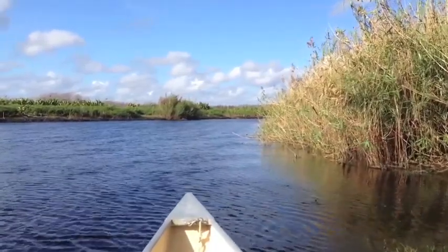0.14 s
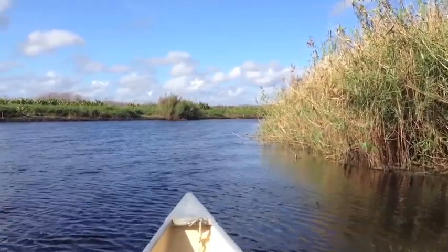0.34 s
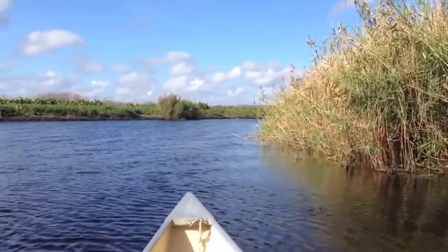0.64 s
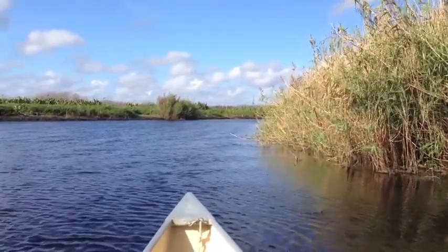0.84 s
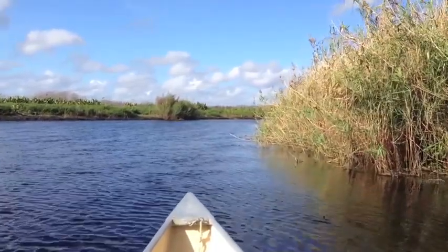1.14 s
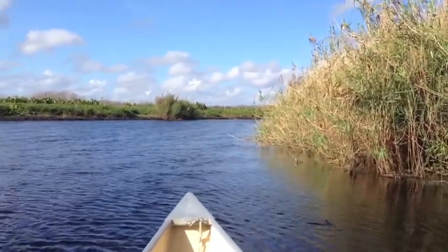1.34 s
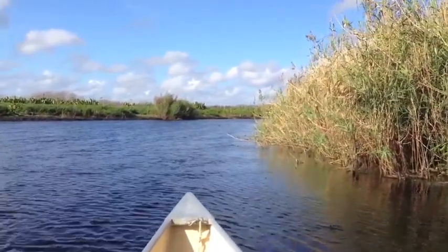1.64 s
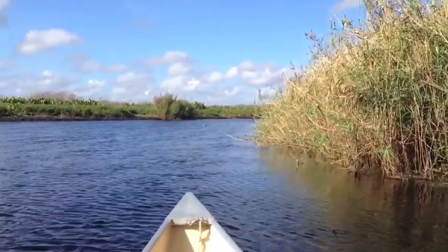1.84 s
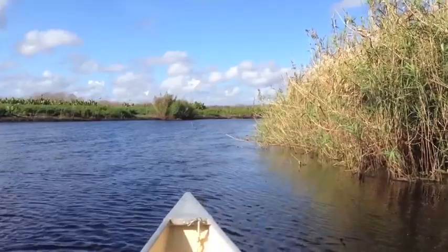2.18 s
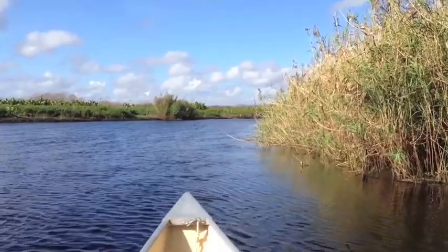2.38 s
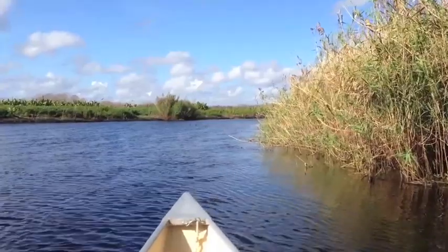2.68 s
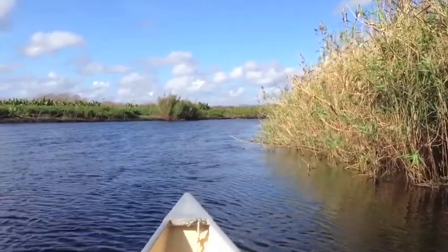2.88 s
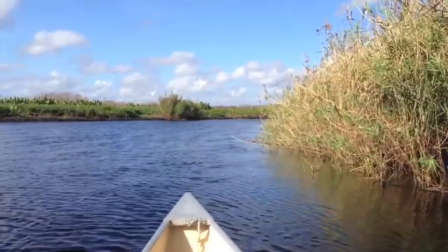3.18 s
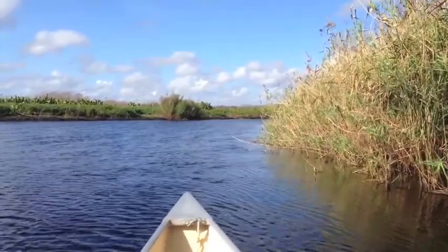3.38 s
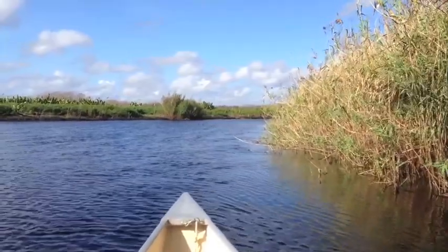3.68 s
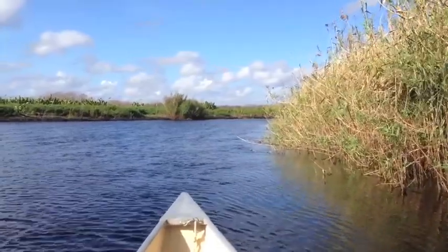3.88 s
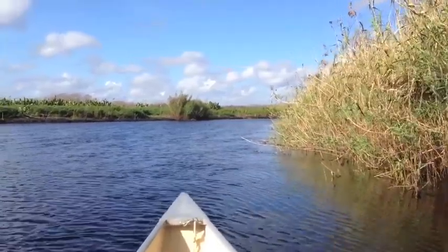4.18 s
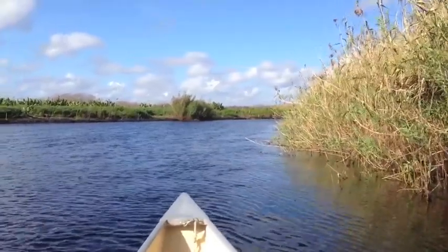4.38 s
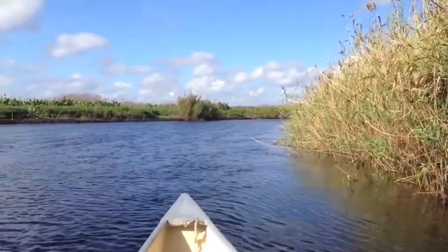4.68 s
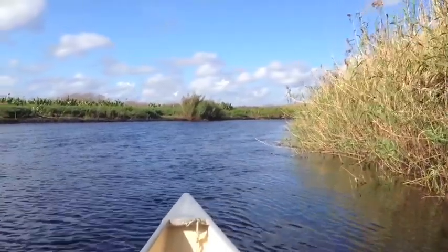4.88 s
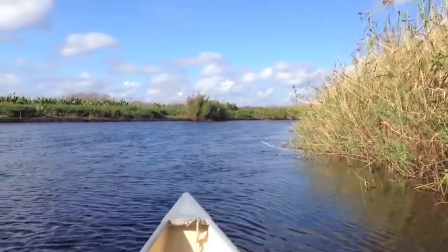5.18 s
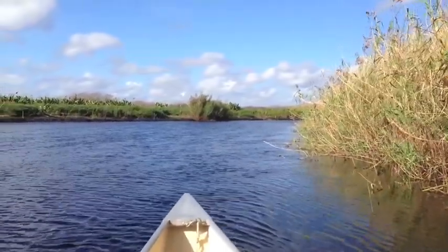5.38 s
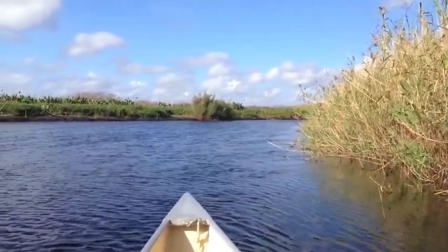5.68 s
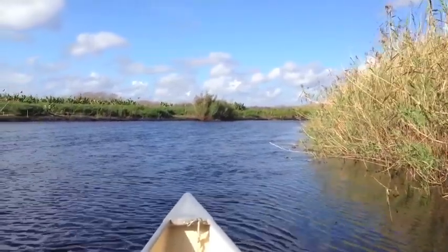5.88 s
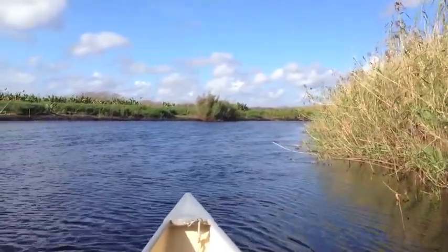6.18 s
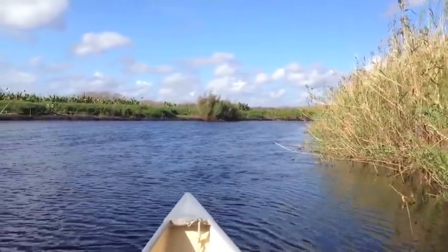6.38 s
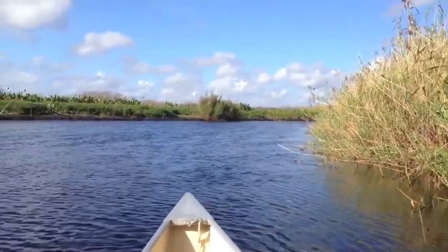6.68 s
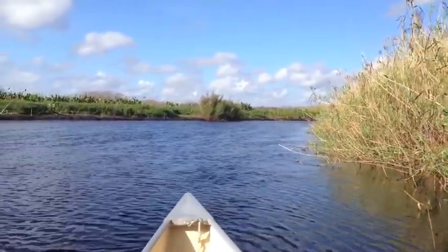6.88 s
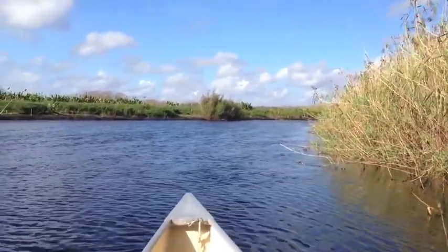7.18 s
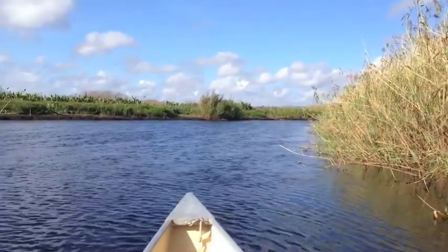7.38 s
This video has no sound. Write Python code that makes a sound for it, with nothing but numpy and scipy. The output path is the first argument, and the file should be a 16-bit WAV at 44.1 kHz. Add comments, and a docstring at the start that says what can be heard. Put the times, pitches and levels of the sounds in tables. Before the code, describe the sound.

An airboat revs up and draws near across open water, its deep engine and propeller drone pulsing slowly as a rough airy hiss swells.

```python
"""A reedy river, heard from a canoe low on the water: an airboat speeds up and draws near.
The engine hums on whole multiples of its four-stroke cycle, in tones that waver a little.
The geared propeller adds its own tones, one of which beats with the engine.
Air off the blades roars and hisses, with a faint throb at the blade rate; gusts rumble on the microphone."""
import sys
import numpy as np
from scipy import signal
from scipy.io import wavfile

SR = 44100
rng = np.random.default_rng(int(sys.argv[2]) if len(sys.argv) > 2 else 0)


def output_pcm(signal):
    """Save a mono or channel-first signal as 16-bit PCM at the path in sys.argv[1].

    Samples are clipped to [-1, 1] before scaling.
    """
    pcm = np.clip(np.atleast_2d(signal).T, -1, 1) * 32767
    wavfile.write(sys.argv[1], SR, np.round(pcm).astype(np.int16))


N = 332514

# levels of the engine's leading tones; the 5th is the drone:
# (time [s], 5th tone [dB], 8th tone [dB], 11th tone [dB])
DRONE = [(0, -34.5, -49, -33.5), (.75, -21.5, -45, -33.5), (1.5, -21, -43, -43), (2.25, -23, -35, -34),
         (3, -19, -35, -29), (3.75, -18, -32, -31.5), (4.7, -17, -44, -23), (5.25, -17, -41, -18.5),
         (5.75, -17.5, -34, -21), (6.25, -19.5, -19, -21), (6.75, -20, -29, -18.5), (7.1, -22, -36, -20.5),
         (7.54, -20, -31, -23)]
# moments when the engine's 5th and the propeller's 2nd tone pull against each other: (time [s])
BEAT_NULLS = [-.9, .05, 1.0, 2.0, 2.93, 3.7, 4.6, 5.78, 7.11, 8.3]


def amp(db):
    """Turn a level in dB into a gain."""
    return 10 ** (np.asarray(db) / 20)


def in_time(rows):
    """Read each column of a (time, value, ...) table at every sample."""
    times, *columns = np.transpose(rows)
    return [np.interp(np.arange(N) / SR, times, column) for column in columns]


def at_hz(points, hz):
    """Read a spectrum table along a log-frequency axis."""
    table_hz, table_db = np.array(points).T
    return np.interp(np.log(hz + 1), np.log(table_hz), table_db)


def swing(first_db, turn_s, turn_db, again_s, again_db, last_db):
    """A level that slides in straight lines through two turning points."""
    times = [0, turn_s, again_s, N / SR]
    return np.interp(np.arange(N) / SR, times, [first_db, turn_db, again_db, last_db])


def drift(rate):
    """Slow random wandering with a spread of 1; a higher rate [Hz] wanders faster."""
    step = 40  # samples between random points
    r = np.exp(-2 * np.pi * rate * step / SR)
    noise = rng.standard_normal(N // step + 2002)
    # the first 2000 points let the smoothing settle
    slow = signal.lfilter([1], [1, -2 * r, r * r], noise)[2000:]
    return np.interp(np.arange(N) / step, np.arange(len(slow)), slow / slow.std())


def tone(turns, level_db, waver_db=.7, wobble=.08):
    """A sine around a given rms level; moving air makes its level [dB] and phase [radians] waver."""
    phase = 2 * np.pi * turns + wobble * drift(3.0)
    gain = np.sqrt(2) * amp(level_db + waver_db * drift(4.0))
    return gain * np.sin(phase)


def shaped_noise(colour, patchy_db, from_hz, to_hz):
    """Noise whose colour(Hz, s) moves in time, set to rms 1 between two pitches, then made patchy by band."""
    hz, s, spectrum = signal.stft(rng.standard_normal(N), SR, nperseg=2048)
    gain = amp(colour(hz, s))
    inside = (hz > from_hz) & (hz < to_hz)
    gain = gain / np.sqrt(np.sum(gain[inside] ** 2, axis=0) / len(hz))
    # each of 28 bands wanders on its own, blending into its neighbours
    centres = np.log(np.geomspace(30, 16000, 28))
    frames = np.minimum((s * SR).astype(int), N - 1)
    patches = np.array([drift(13.7)[frames] for _ in centres])
    distance = np.abs(np.log(hz + 1)[:, None] - centres) / (centres[1] - centres[0])
    blend = np.maximum(1 - distance, 0)
    shaped = spectrum * gain * amp(patchy_db * blend @ patches)
    return signal.istft(shaped, SR, nperseg=2048)[1][:N]


def turning():
    """Count engine cycles and blade passes since the start."""
    # engine speed: (time [s], four-stroke cycles per second [Hz])
    engine_speed = [(0, 20.95), (.2, 22.1), (.6, 24.0), (1.0, 25.65), (1.2, 26.19), (1.8, 26.82),
                    (2.0, 27.13), (2.6, 28.45), (3.0, 28.77), (3.5, 28.81), (4.1, 28.58), (4.4, 28.26),
                    (4.8, 27.49), (5.0, 27.27), (5.5, 27.18), (6.3, 26.64), (7.2, 27.52), (7.54, 27.51)]
    cycles = np.cumsum(in_time(engine_speed)[0]) / SR
    # half a beat at each null puts the two tones in opposite phase
    beats = np.interp(np.arange(N) / SR, BEAT_NULLS, np.arange(len(BEAT_NULLS)) + .5)
    # the gearing gives a little over 2.5 passes a cycle: the surplus sets the beat
    passes = (5 * cycles + beats) / 2
    return cycles, passes


def engine(cycles, roar_db):
    """Uneven exhaust paths leave tones on whole multiples of the engine cycle."""
    # other strong tones grow as the boat swings round: (multiple of the cycle, first level [dB],
    # turning point [s], level then [dB], second turning point [s], level then [dB], last level [dB])
    strong_tones = [(3, -44, .8, -29.5, 3.5, -23, -22.5), (9, -65, 2.32, -36, 3.97, -26.5, -20)]
    # weaker tones, set against the roar's level curve:
    # (multiple of the cycle, level far off [dB], level near [dB])
    weak_tones = [(2, -28, -11), (4, -1, -20.5), (6, -39, -12), (7, -20, -12.5), (10, -9, -13),
                  (12, -8.5, -13.5), (13, -10.5, -13.5), (14, -17, -22), (16, -11.5, -28), (17, -19, -17),
                  (19, -26, -13), (20, -30, -14.5), (21, -44, -20), (22, -13.5, -14.5), (24, -24, -12.5)]
    leading = sum(tone(k * cycles, db) for k, db in zip((5, 8, 11), in_time(DRONE)))
    strong = sum(tone(round(k) * cycles, swing(*slide)) for k, *slide in strong_tones)
    near = np.linspace(0, 1, N)  # far off at the start, near at the end
    weak = 0
    for k, far_db, near_db in weak_tones:
        level_db = roar_db + far_db + near * (near_db - far_db)
        weak = weak + tone(round(k) * cycles + rng.random(), level_db, waver_db=2.0, wobble=0.16)
    return leading + strong + weak


def propeller(passes):
    """Each blade pass is a steep pressure pulse, built from a stack of tones almost in step."""
    # the propeller's 2nd tone over the engine's 5th at each beat null: (level [dB])
    beat_depth = [-5, -1, -5, -17, -5.5, -6, -11, -7, -1.5, 6]
    # strong blade tones: (multiple of the blade rate, first level [dB], turning point [s],
    # level then [dB], second turning point [s], level then [dB], last level [dB])
    strong_tones = [(1, -53, 2, -38, 4.8, -33.5, -36), (3, -47.5, 1.96, -44.5, 4.5, -30.5, -27),
                    (4, -54, 1.26, -37, 9.2, -36.5, -40), (5, -49.5, 3.9, -30, 5.4, -40, -42),
                    (6, -49.5, 3, -35.5, 7.7, -42, -51), (7, -51.5, 3.3, -40.5, 5.63, -31.5, -58)]
    # the higher blade tones' shared level: (time [s], level [dB])
    high_level = [(0, -70), (.7, -43.5), (2.4, -47.5), (3.1, -41), (4.25, -40.5), (5.4, -48), (6.4, -40),
                  (7.54, -41.5)]
    # each higher tone against that shared level: (multiple of the blade rate, level [dB])
    high_tones = [(8, -6.5), (9, -1.5), (10, -2.5), (11, -3), (12, -8.5), (13, -10), (14, -29), (15, -12.5),
                  (16, -20), (17, -6)]
    over_engine_db, = in_time(list(zip(BEAT_NULLS, beat_depth)))
    second = tone(2 * passes, in_time(DRONE)[0] + over_engine_db)
    strong = sum(tone(round(k) * passes, swing(*slide), waver_db=3.5) for k, *slide in strong_tones)
    high_db, = in_time(high_level)
    high = sum(tone(round(k) * passes, high_db + db, waver_db=2.0, wobble=0.2) for k, db in high_tones)
    return second + strong + high


def treble_flares():
    """Tilt of the hiss in dB per octave above 3 kHz: the treble flares or dulls for a moment."""
    # (time [s], tilt [dB per octave])
    flares = [(.8, 1.5), (2.1, 2.6), (3.1, 3.5), (4.05, 2.5), (4.95, -2.5), (7.5, 1.5)]
    flare_s = 0.36
    t = np.arange(N) / SR
    return sum(db * np.exp(-((t - s) / flare_s) ** 2) for s, db in flares)


def hiss_colour(hz, s, tilt_db):
    """Colour of the hiss in dB as the boat draws near, with notches, the deepest near 2.8 kHz when close."""
    # five colours from far to near, each: (frequency [Hz], density [dB per Hz])
    far = [(470, -34), (800, -5), (962, -2), (1100, -7.5), (1180, -2.5), (1780, -7.5), (2060, -8),
           (2220, -10.5), (4690, -16), (5300, -15), (5700, -20), (7470, -21.5), (15000, -41)]
    coming = [(470, -33), (800, -18), (998, 4.5), (1070, -11), (1180, 0), (1710, -2), (2240, -2),
              (3010, -11.5), (3710, -6.5), (4630, -11), (5300, -13), (8550, -21.5), (15000, -38)]
    midway = [(470, -39), (800, -1), (938, -4.5), (1460, -0.5), (2140, -10), (2570, -10.5), (2940, -18.5),
              (3530, -9), (4350, -17.5), (5110, -13), (5920, -21), (7290, -22), (11100, -33), (15000, -47)]
    closing = [(470, -31), (800, -2), (1180, 2), (1440, -4.5), (2030, -0.5), (2390, -1.5), (2940, -18),
               (3280, -7.5), (4200, -16), (5040, -10), (5770, -15), (9550, -23), (15000, -39)]
    near = [(470, -17), (800, -4.5), (1230, -6.5), (1550, 1), (1950, 1.5), (2400, -5), (2620, -19),
            (2980, -22), (3150, -7.5), (3850, -13), (4460, -8.5), (6450, -13.5), (9550, -18.5),
            (15300, -30)]
    # when each colour holds alone: (time [s])
    colour_times = [.8, 2.05, 3, 4.2, 5.0]
    # shallower notches that slide in pitch:
    # (from [s], to [s], from [Hz], to [Hz], width [Hz], depth [dB])
    sliding_notches = [(-1, 1.4, 2800, 2950, 290, 5), (0, 3.1, 4850, 4550, 200, 5),
                       (3, 7.7, 6160, 4570, 280, 3.5), (2.5, 6.5, 8900, 8300, 400, 2)]
    colours = np.array([at_hz(c, hz) for c in (far, coming, midway, closing, near)])
    # fade from each colour into the next
    steps = np.arange(len(colour_times))
    stage = np.interp(s, colour_times, steps)
    weights = np.maximum(1 - np.abs(stage - steps[:, None]), 0)
    # a deep notch near 2.8 kHz in the near colour varies randomly in depth
    notch_hz, notch_width_hz, notch_waver_db = 2780, 190, 4
    depth_drift = drift(13.0)[np.minimum((s * SR).astype(int), N - 1)] * weights[-1]
    notch_shape = np.exp(-((hz - notch_hz) / notch_width_hz) ** 2)
    notches = np.outer(notch_shape, notch_waver_db * depth_drift)
    for from_s, to_s, from_hz, to_hz, width_hz, depth_db in sliding_notches:
        along = np.clip((s - from_s) / (to_s - from_s), 0, 1)
        centre = from_hz + along * (to_hz - from_hz)
        fade = np.sqrt(np.sin(np.pi * along).clip(0))  # comes in and goes out smoothly
        notches = notches - depth_db * fade * np.exp(-((hz[:, None] - centre) / width_hz) ** 2)
    octaves = np.log2(np.maximum(hz / 3000, 1))
    tilt = np.outer(octaves, np.interp(s, np.arange(N) / SR, tilt_db))
    return colours.T @ weights + notches + tilt


def wash(passes, roar_db, hiss_db):
    """Turbulent air off the blades: a low roar and a hiss, both throbbing slightly at the blade rate."""
    # (frequency [Hz], density [dB per Hz])
    roar_colour = [(20, -31), (45, -11), (70, 1), (110, 0.5), (170, -3), (250, -2), (380, -5), (550, -6.5),
                   (800, -13), (1100, -19.5), (1600, -46)]
    tilt_db = treble_flares()
    roar = shaped_noise(lambda hz, s: at_hz(roar_colour, hz)[:, None] + 0 * s, 0.83, 380, 830)
    hiss = shaped_noise(lambda hz, s: hiss_colour(hz, s, tilt_db), 1.0, 880, 15000)
    throb = np.cos(2 * np.pi * passes + 1.0 * drift(7.3))
    hiss_throb_db = 0.68 + 1.0 * drift(2.5)  # the hiss throbs by a wandering amount
    roar_gain = amp(roar_db + 0.78 * throb - 2.5)
    hiss_gain = amp(hiss_db + hiss_throb_db * throb)
    return roar_gain * roar + hiss_gain * hiss


def breeze():
    """Lumpy low rumble of wind on the microphone, swelling at each gust."""
    # (time [s], peak level before the random lumps [dB])
    gusts = [(.7, -35), (2.3, -32), (3.3, -35), (4.5, -29), (5.3, -32), (6.1, -36)]
    calm_db, fade_db_per_s = -46, 33
    t = np.arange(N) / SR
    gust_db = np.max([db - fade_db_per_s * np.abs(t - s) for s, db in gusts], axis=0)
    low_band = signal.butter(2, [24, 70], "band", fs=SR, output="sos")
    rumble = signal.sosfilt(low_band, rng.standard_normal(N))
    lumps_db = 6.4 * drift(8.0)
    return amp(np.maximum(gust_db, calm_db) + lumps_db) * rumble / rumble.std()


def scene():
    """Add engine, propeller tones, air wash and breeze in one channel."""
    # level curves for the wash of air; the roar plays 2.5 dB below its curve:
    # (time [s], low roar [dB], hiss [dB])
    wash_levels = [(0, -41, -48.5), (.4, -42, -46), (.8, -36, -42), (1.2, -37, -38.5), (1.6, -35, -39),
                   (2.4, -33, -37), (2.8, -31, -33.5), (3.0, -32, -33.5), (3.3, -28, -30.5),
                   (3.8, -28.5, -31), (4.3, -26, -29), (4.7, -28, -29), (5.1, -26, -25.5),
                   (5.6, -26.5, -28.5), (6.0, -24.5, -25.5), (6.5, -26.5, -26.5), (6.8, -25.5, -24.5),
                   (7.0, -26, -25), (7.4, -24, -23), (7.54, -25, -23.5)]
    roar_db, hiss_db = in_time(wash_levels)
    cycles, passes = turning()
    boat = engine(cycles, roar_db) + propeller(passes) + wash(passes, roar_db, hiss_db)
    return (boat + breeze())[None, :]


def record(dry):
    """Round off the peaks gently, then cut everything above about 15 kHz."""
    rounded = .95 * np.tanh(dry / .95)
    top_cut = signal.ellip(12, .3, 70, 15200, fs=SR, output="sos")  # .3 dB ripple, 70 dB cut, 15200 Hz
    return signal.sosfilt(top_cut, rounded)


dry = scene()
out = record(dry)
output_pcm(out)
```